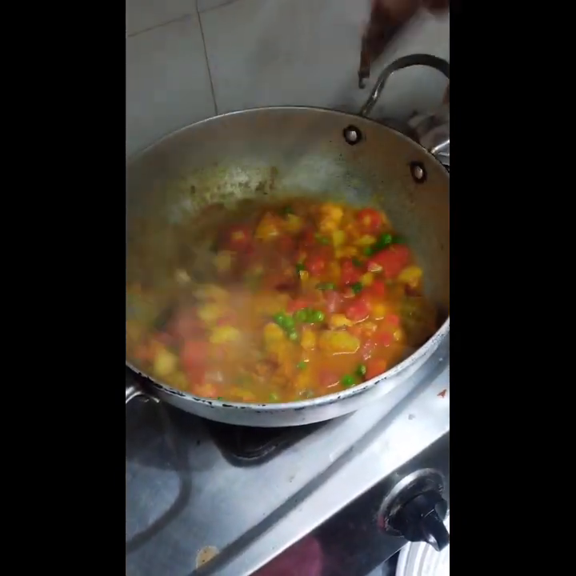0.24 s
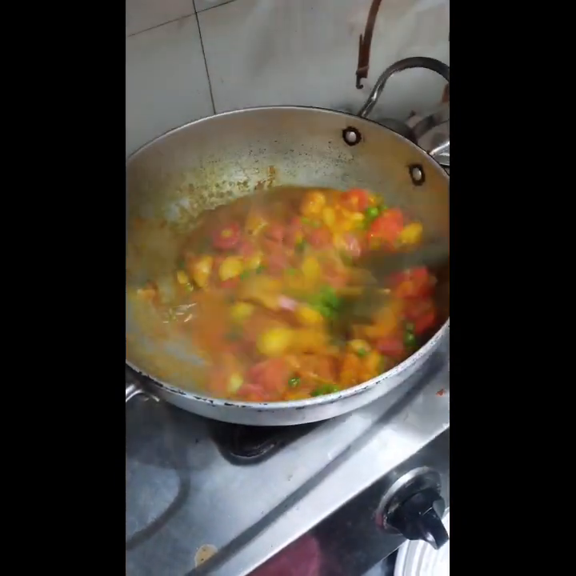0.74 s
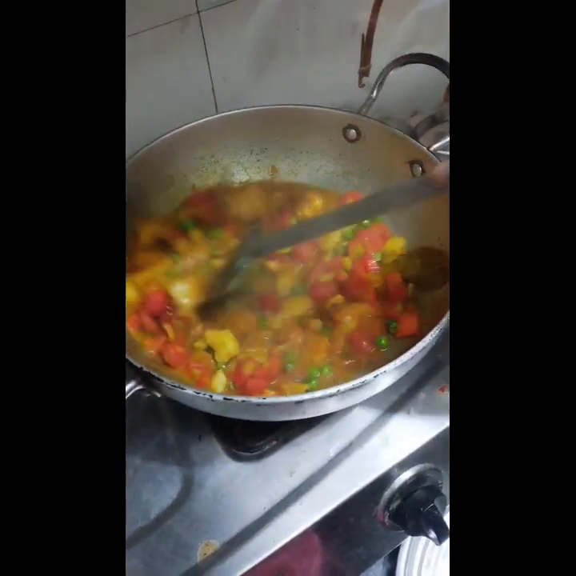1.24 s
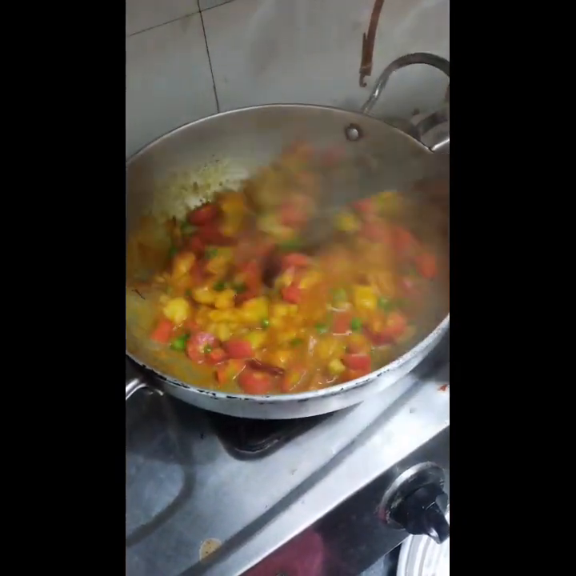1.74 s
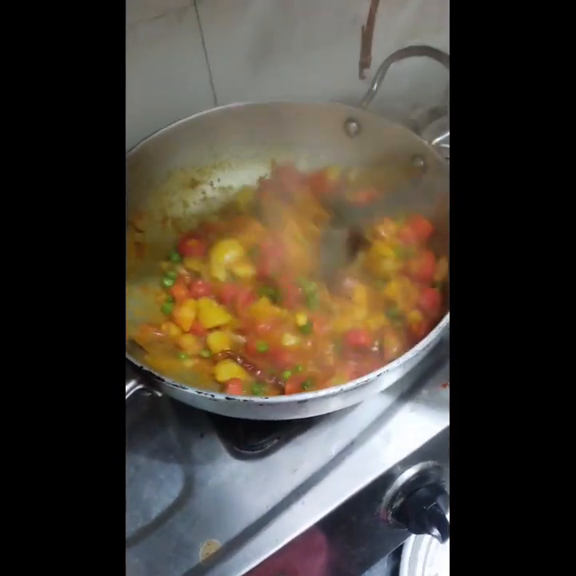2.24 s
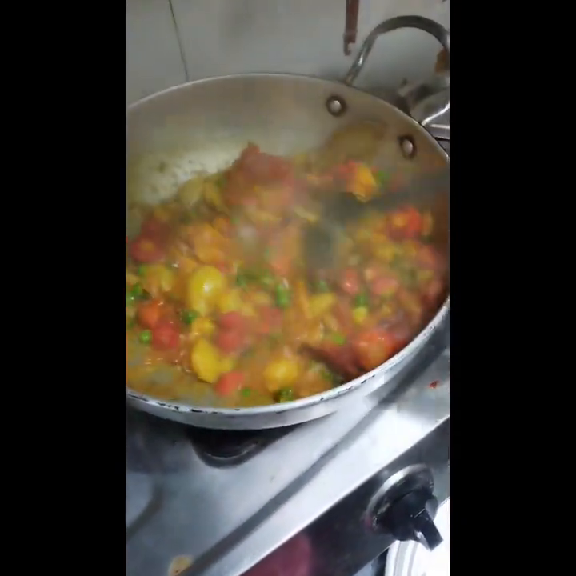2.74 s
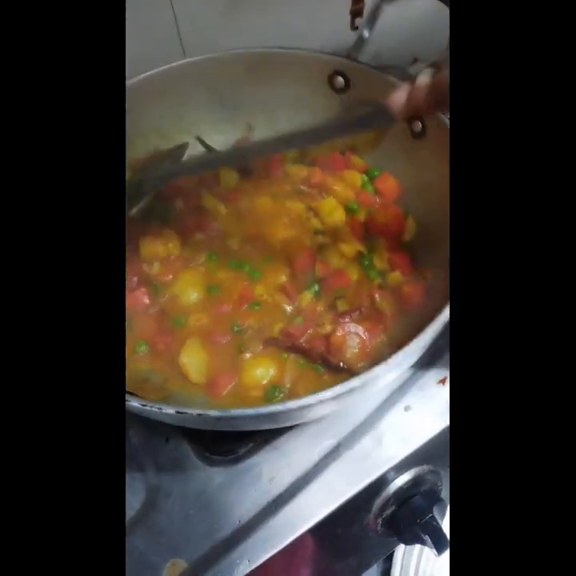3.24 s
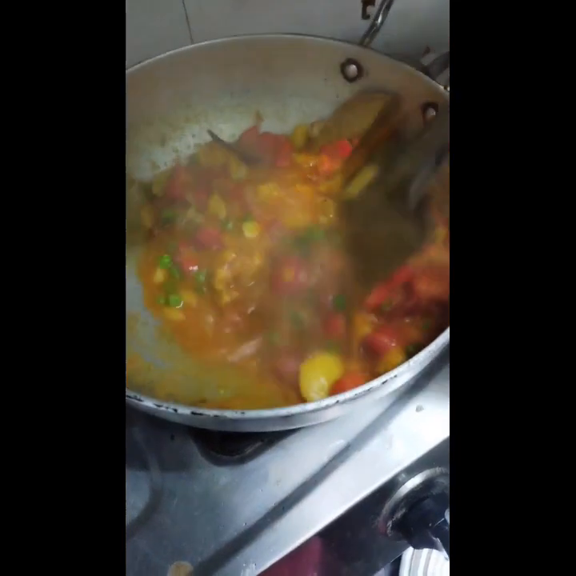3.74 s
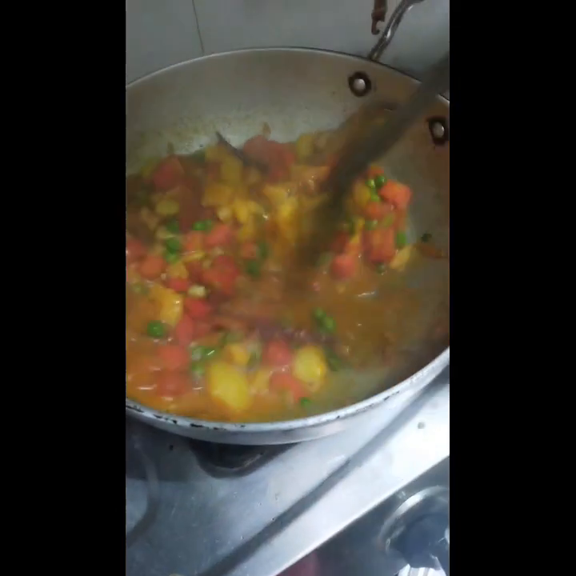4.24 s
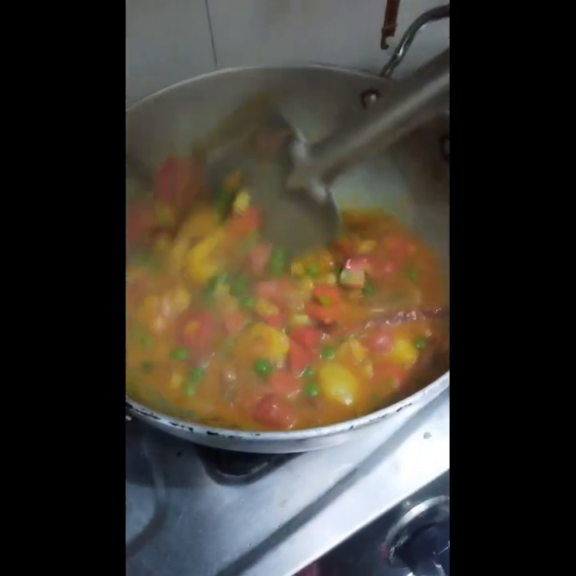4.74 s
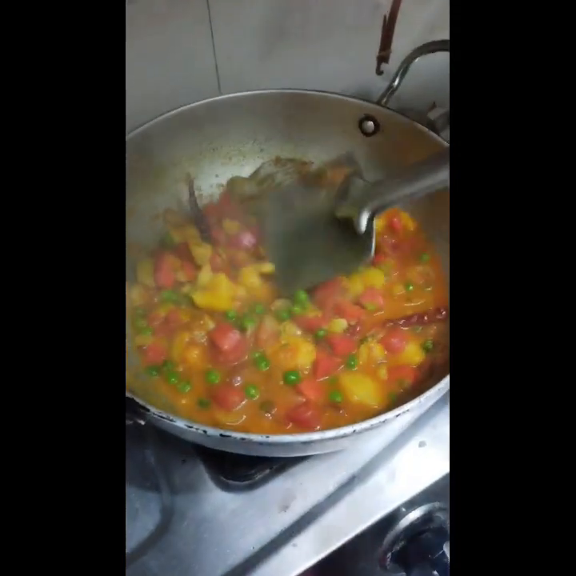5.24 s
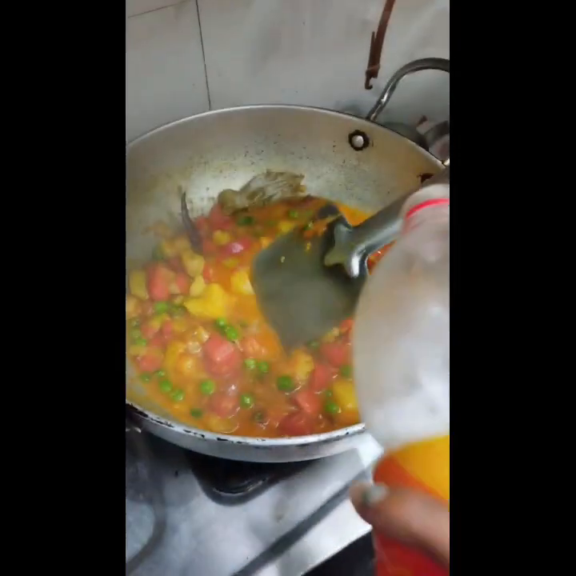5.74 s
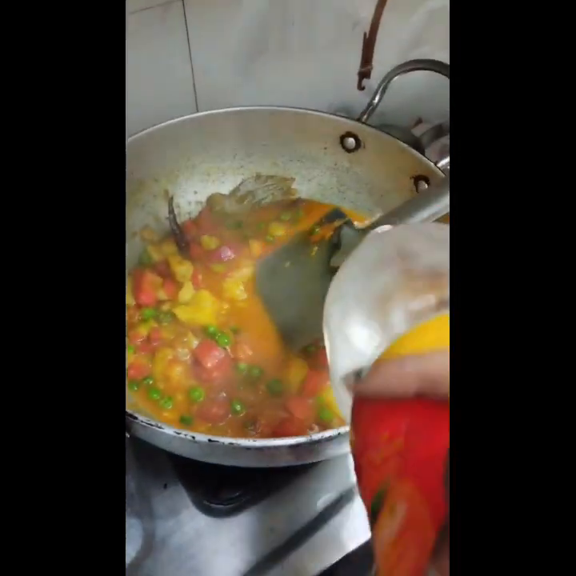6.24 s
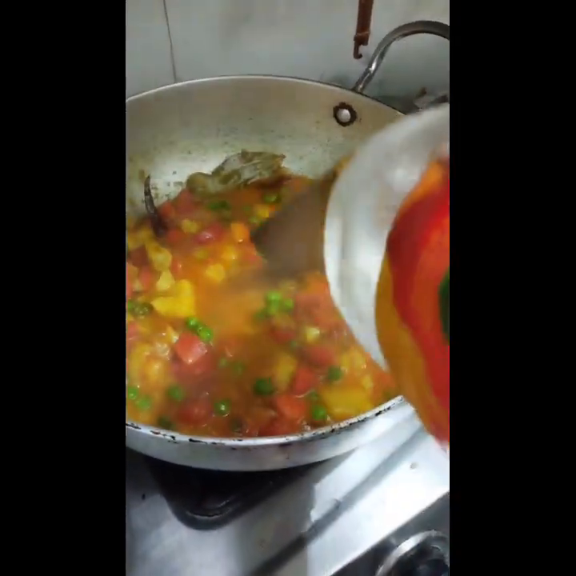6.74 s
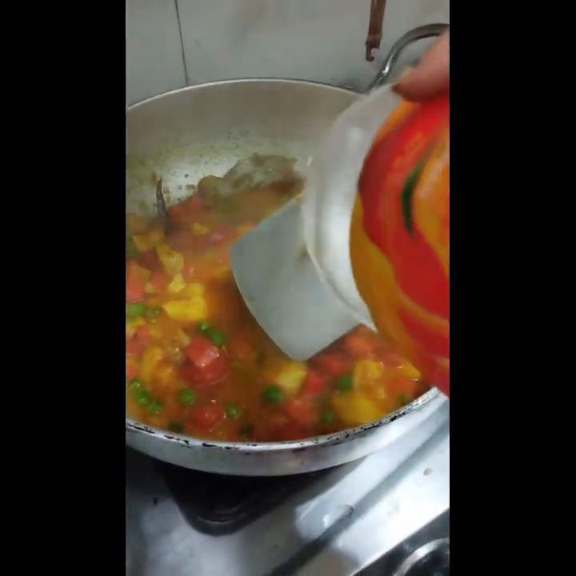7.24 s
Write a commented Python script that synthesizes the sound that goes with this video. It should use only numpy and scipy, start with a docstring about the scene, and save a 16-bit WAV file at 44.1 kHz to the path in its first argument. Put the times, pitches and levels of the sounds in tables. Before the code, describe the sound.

A bright steel clash opens the scene, then a spatula pushes in short wet scrapes through vegetables frying with a steady crisp sizzle. A loud metallic scrape and double bangs follow mid-way. The spatula settles with light ticks, a plastic bottle crumples and pops sharply, and water glugs in low gulps with tiny drips. Close microphone, small tiled kitchen, soft low rumble.

```python
"""A steel spatula strikes, skids and scrapes through vegetables sizzling in a metal pan in a small tiled kitchen.
Coloured noise and grains make the scraping and frying; decaying modes make the pan and spatula ring.
The pan knocks on its stand and the spatula ticks as it comes to rest: short bursts of noise and small rings.
A plastic bottle crumples and pops as noise bursts, then water glugs and drips as short rising tones.
A soft low rumble lies under it all. Table levels are relative, ahead of the gains in each function and the mix."""
import sys
import numpy as np
from scipy import signal
from scipy.fft import rfft, irfft, next_fast_len
from scipy.io import wavfile
from scipy.ndimage import map_coordinates

SR = 44100
rng = np.random.default_rng(int(sys.argv[2]) if len(sys.argv) > 2 else 0)


def pcm_store(signal):
    """Save signal as 16-bit PCM."""
    levels = np.round(np.clip(np.atleast_2d(signal), -1, 1) * 32767)
    wavfile.write(sys.argv[1], SR, levels.astype(np.int16).T)


N = 330303
T = np.arange(N) / SR

# the blade strikes the pan: start_s, clash_db, thud_db, ring_db, bowl_tone_db
PAN_BLOWS = [(0.027, -6.5, -19, -34.5, -38), (.086, -15, -42, -34, -39), (3.459, -20.5, -10.5, -23, -25),
             (4.115, -11, -18, -32, -55), (4.131, -11, -22.5, -20, -30.5), (4.599, -6, -18.5, -26.5, -26),
             (4.614, -6.5, -25, -27, -50)]
# the resting spatula taps the rim and nudges the pan: start_s, ping_db, knock_db
RIM_TAPS = [(5.2706, -23, -29.5), (5.3445, -23.5, -47), (5.425, -34.5, -37.5), (5.475, -27.5, -29.5),
            (5.5417, -23, -34), (5.5633, -22.5, -37.5), (5.888, -15.5, -31)]
# modes of the pan, ringing freely: pitch_hz, level_db, t60_s
PAN_MODES = [(243, -16, 1), (298, -8, .2), (464, -4, .17), (748, -9, .35), (1768, -12, .35),
             (1873, -2, .42), (2030, -9, .13), (2305, -5, .22), (2680, -7, .12), (3010, -4.5, .18),
             (3382, -3.5, .14), (4900, -6, .12), (6050, -5, .1), (7258, -1, .13), (8232, -6, .12),
             (8515, -7, .12), (9120, -6, .12)]
# the pan's bowl tone, one mode with a level of its own in each blow: pitch_hz, level_db, t60_s
BOWL_MODE = (1233, 0, 0.38)
# colour of steel edge on steel: frequency_hz, level_db
EDGE_COLOUR = [(1000, -45.5), (3000, -37.5), (4500, -14.5), (6000, -12), (7300, -6), (8300, 1),
               (9500, -2.5), (11000, -8.5), (12500, -15.5), (15500, -20.5)]


def amp(db):
    """Decibels to gain."""
    return 10 ** (np.asarray(db) / 20)


def unit(x):
    """Scale to rms 1."""
    return x / np.sqrt(np.mean(x ** 2) + 1e-20)


def along(points, hz):
    """Interpolate (frequency, value) points on a log frequency axis."""
    f, v = np.transpose(points)
    return np.interp(np.log(hz + 1), np.log(f + 1), v)


def wobble(rate):
    """A smooth random curve with rate knots a second."""
    knots = rng.standard_normal(int(N * rate / SR) + 4)
    return map_coordinates(knots, [T * rate], order=2)


def filtered(x, gain):
    """x times a gain that depends on frequency."""
    m = next_fast_len(N + SR // 2)
    hz = np.fft.rfftfreq(m, 1 / SR)
    return irfft(rfft(x, m) * gain(hz), m)[:N]


def noise(spectrum):
    """Smooth coloured noise of rms 1."""
    white = rng.standard_normal(N)
    return unit(filtered(white, lambda hz: amp(along(spectrum, hz))))


def grains(spectrum, rate, spread_db, smooth_db):
    """Tiny random impulses of uneven size over a bed too dense to tell apart, rms 1."""
    when, size, sign = rng.random((int(rate * N / SR), 3)).T
    sizes = amp(spread_db * np.minimum(-np.log(1 - size), 4)) * np.sign(sign - .5)
    clicks = np.bincount((when * N).astype(int), sizes, N)
    both = unit(clicks) + amp(smooth_db) * rng.standard_normal(N)
    return unit(filtered(both, lambda hz: amp(along(spectrum, hz))))


def fade(t, t60):
    """Gain of a free decay that loses 60 dB in t60 seconds."""
    return np.exp(-np.log(1000) * t / max(t60, 1e-3))


def swell_in(t, rise):
    """Gain that rises towards 1 with a time constant of rise seconds."""
    return 1 - np.exp(-t / max(rise, 1e-4))


def add(track, s, sound):
    """Mix a sound into a track at time s."""
    part = track[max(round(s * SR), 0):][:len(sound)]
    part += sound[:len(part)]


def bursts(rows, rise, t60):
    """Envelope of hits (start_s, level_db) that swell and die away."""
    env, t = np.zeros(N), T[:SR]
    for s, db in rows:
        add(env, s, amp(db) * swell_in(t, rise) * fade(t, t60))
    return env


def ring(modes, scatter_db):
    """One ring of a struck body: decaying sines whose levels scatter and whose signs are random."""
    t = T[:SR * 2 // 3]
    out = np.zeros(len(t))
    for hz, db, t60 in modes:
        strength = amp(db + scatter_db * rng.normal()) * rng.choice([-1, 1])
        out += strength * fade(t, t60) * np.sin(2 * np.pi * hz * t)
    return out


def resonate(x, modes):
    """A body's answer to a continuous push, through one ring of unit energy."""
    body = ring(modes, scatter_db=7.5)
    return signal.fftconvolve(x, body / np.linalg.norm(body))[:N]


def shifting(x):
    """Short-lived resonances come and go as a smooth random gain over frequency and time; rms 1."""
    depth_db, width_hz, life_s = 3.0, 264.6, .04
    hz, t, z = signal.stft(x, SR, nperseg=512)
    knots = rng.standard_normal((400, 800))
    grid = np.meshgrid(hz / width_hz, t / life_s, indexing="ij")
    field = map_coordinates(knots, grid, order=2, mode="mirror")
    return unit(signal.istft(z * amp(depth_db * field), SR, nperseg=512)[1][:N])


def room_tone():
    """The burner rumbles softly and steadily; now and then the same low noise swells and sinks again."""
    # swells of the rumble: start_s, level_db, t60_s
    swells = [(.95, -50, 1.7), (2.2, -59, 12), (3.5, -33, 1.15), (4.3, -44.5, 10), (5.549, -50.5, 8.4),
              (6.07, -55, 0.71), (7.0, -56, 3.2)]
    # colour of the rumble: frequency_hz, level_db
    rumble_colour = [(15, -4.5), (27, 3.5), (38, -2.5), (52, -18.5), (72, -10), (110, -7), (170, -17),
                     (290, -18), (450, -23.5), (1000, -34.5), (3000, -41), (15000, -80)]
    level = amp(-58)  # the steady burner
    for s, db, t60 in swells:
        age = np.maximum(T - s, 0)
        level = level + amp(db) * swell_in(age, 0.013) * fade(age, t60)
    return level * noise(rumble_colour)


def kitchen(x):
    """Tiled walls answer closely with a tail of decaying noise; the treble dies first."""
    # decay time of the room: frequency_hz, t60_s
    room_decay = [(150, 1), (400, 0.37), (1000, 0.38), (3000, 0.3), (8000, 0.31), (15000, 0.21)]
    hz, t, z = signal.stft(rng.standard_normal(SR // 2), SR, nperseg=256)
    decay = np.exp(-np.log(1000) * t / along(room_decay, hz)[:, None])
    tail = signal.istft(z * decay, SR, nperseg=256)[1]
    tail = np.concatenate([np.zeros(SR // 250), tail])  # 4 ms before the first answer
    return signal.fftconvolve(x, tail / np.linalg.norm(tail))[:N]


def drips():
    """A few small drops from the bottle plink into the sauce, each a tiny bubble of rising pitch."""
    # single drops: start_s, level_db, starting pitch_hz
    drops = [(6.76, -54, 2710), (7.04, -50, 2430), (7.304, -43.5, 1320)]
    out, t = np.zeros(N), T[:SR // 4]
    for s, db, hz in drops:
        tone = np.sin(2 * np.pi * hz * t * (1 + .5 * t))
        add(out, s, amp(db) * swell_in(t, 0.0025) * fade(t, 0.049) * tone)
    return out


def glugs():
    """Air gulps back through the bottle neck: a big and a small bubble, rising a little, with a slosh around them."""
    # gulps, about seven a second: start_s, big_bubble_db, small_bubble_db
    gulps = [(6.613, -32, -27), (6.753, -30, -39), (6.908, -25, -37), (7.034, -50, -41),
             (7.189, -25.5, -43), (7.328, -38.5, -51), (7.443, -32.5, -53)]
    # the big and the small bubble: starting pitch_hz, t60_s
    bubbles = [(270, .085), (486, 0.055)]
    # colour of the sloshing water: frequency_hz, level_db
    slosh_colour = [(80, 3), (170, -2), (280, -6), (650, -7.5), (1000, -30), (2000, -46), (6000, -22.5),
                    (15000, -27)]
    slosh_rows = [(s, max(levels)) for s, *levels in gulps]
    out = amp(-5.5) * bursts(slosh_rows, rise=0.0018, t60=0.088) * noise(slosh_colour)
    t = T[:SR // 2]
    for s, *levels in gulps:
        for db, (hz, t60) in zip(levels, bubbles):
            tone = np.sin(2 * np.pi * hz * t * (1 + 1.5 * t))
            add(out, s, amp(db) * swell_in(t, 0.0033) * fade(t, t60) * tone)
    return out


def bottle():
    """Thin plastic crumples in a run of snaps that ring the hollow body, then pops back."""
    # small dry snaps as the bottle is picked up and handled: start_s, level_db
    creases = [(4.992, -41.5), (5.636, -27), (6.098, -27.5), (6.49, -29.5), (6.54, -40.5), (6.84, -48),
               (7.339, -35.5)]
    # the wall buckles: start_s, hollow_db, crackle_db, rise_s, hollow t60_s
    buckles = [(5.647, -16, -20.5, 0.013, 0.49)]
    # the dented wall springs back: start_s, level_db, t60_s
    spring_back = (6.2995, -8.5, .16)
    # air and walls of the bottle: pitch_hz, level_db, t60_s
    bottle_modes = [(500, -9, 0.77), (561, -5, 0.26), (684, 3, 0.1), (930, 7, 0.12), (1058, -16, 0.23),
                    (1108, -5.5, 0.16), (1203, -19, 0.1), (1850, -6, 0.043), (2700, -6.5, 0.04)]
    # colours of the hollow body, the crackle and the pop: frequency_hz, level_db
    hollow_colour = [(50, -32), (160, -12), (430, -13), (510, 0), (690, -5), (820, -3), (980, -3),
                     (1170, 5.5), (1350, -4.5), (1850, 0.5), (2500, -4.5), (3200, -8.5), (3800, -14.5),
                     (9000, -27)]
    crackle_colour = [(800, -13), (3000, -16.5), (5000, -11.5), (6800, -4.5), (8500, 2), (10500, -4),
                      (12500, -13.5), (15500, -34)]
    pop_colour = [(100, -51), (240, -13.5), (350, -14), (750, -6.5), (1500, -3.5), (2100, -4), (2700, -6),
                  (3500, -14.5), (5000, -9.5), (7000, -15.5), (8400, -7), (10500, -10.5), (12500, -23),
                  (15500, -30)]

    snaps = grains(hollow_colour, rate=570, spread_db=2.5, smooth_db=10.5)
    body = unit(resonate(rng.standard_normal(N), bottle_modes))
    hollow = unit(snaps + body)
    crackle = grains(crackle_colour, rate=800, spread_db=2.5, smooth_db=6)
    out = amp(1.5) * bursts(creases, rise=0.00063, t60=0.078) * crackle
    for s, hollow_db, crackle_db, rise, t60 in buckles:
        boom = bursts([(s, hollow_db)], rise, t60) * hollow
        rustle = bursts([(s, crackle_db)], rise, 0.68 * t60) * crackle
        out += amp(2.5) * (boom + rustle)
    s, db, t60 = spring_back
    return out + bursts([(s, db)], rise=0.00018, t60=t60) * noise(pop_colour)


def knocks():
    """Short hollow knocks of the pan on its stand: an even run when it rocks, a single one after a tap."""
    # the pan is set rocking: start_s, first_knock_db, rocking_s, change_per_knock_db
    rockings = [(.972, -24.5, .18, -3.5), (1.383, -23, .06, 0.5), (3.853, -32, .1, -2),
                (4.289, -32, .06, 5.5), (4.542, -37.5, .02, 0), (4.994, -33.5, .02, 0),
                (6.075, -36, .06, 5)]
    # colour of pan on stand: frequency_hz, level_db
    stand_colour = [(100, -14), (300, -23), (700, -12.5), (950, -21.5), (1090, 5), (1280, -19),
                    (1500, -9.5), (2000, -12.5), (2800, -23.5), (8000, -24.5)]
    period_s, nudge_lag_s = .041, .009  # knock to knock; tap to knock
    hits = []
    for s, db, length, step_db in rockings:
        for k in range(int(length / period_s) + 1):
            hits.append((s + k * period_s, db + k * step_db))
    hits += [(s + nudge_lag_s, db) for s, _, db in RIM_TAPS]
    return amp(3.0) * bursts(hits, rise=0.0037, t60=0.053) * noise(stand_colour)


def ticks():
    """Light taps make the spatula ping; scattered modes change the colour of each ping, not its peak."""
    # modes of the spatula, ahead of a common fade: pitch_hz, level_db, t60_s
    spatula_modes = [(5060, -9.5, 0.052), (6300, -16, .08), (8000, 1, 0.029), (8990, 3.5, 0.066),
                     (9000, -7, 0.062), (9720, 7, 0.049), (11220, -8, 0.066), (12600, -10, .055),
                     (13900, -16, 0.037), (15000, -18.5, .04)]
    taps, t = [row[:2] for row in RIM_TAPS], T[:SR * 2 // 3]
    out = amp(-8) * bursts(taps, rise=0.0018, t60=0.036) * noise(EDGE_COLOUR)
    for s, db in taps:
        ping = ring(spatula_modes, scatter_db=4.5) * swell_in(t, 0.0014) * fade(t, t60=0.14)
        add(out, s, amp(db + 1) * ping / np.abs(ping).max())
    return out


def sizzle():
    """Countless steam bubbles burst in the oil; every flare adds its own power to the simmer."""
    # wet food is turned onto hot metal, flares up and dries off: start_s, level_db, t60_s
    flares = [(0, -38, 3.9), (1.155, -36, 8.9), (1.78, -33.5, 2.9), (4.45, -38, 2.1)]
    # colour of frying: frequency_hz, level_db
    frying_colour = [(150, -11.5), (400, -21), (1200, -16), (2500, -17), (4000, -21.5), (6000, -15),
                     (7300, -8.5), (8400, -2.5), (9500, -5.5), (11000, -10), (12500, -18), (15500, -18.5)]
    power = amp(-51.5) ** 2  # the steady simmer
    for s, db, t60 in flares:
        age = np.maximum(T - s, 0)
        power = power + (amp(db) * swell_in(age, 0.011) * fade(age, t60)) ** 2
    flutter = amp(0.48 * wobble(10))
    return np.sqrt(power) * flutter * grains(frying_colour, rate=990, spread_db=3.0, smooth_db=3.5)


def squeals():
    """Friction feeds one resonance with a wandering phase; the narrower it is, the longer it rings on when let go."""
    # the sliding edge makes the metal sing: start_s, length_s, pitch_hz, width_hz, level_db
    squeal_rows = [(0.102, 0.12, 3006, 15, -40.5), (0.207, 0.039, 3620, 62, -33.5),
                   (0.231, .198, 1232, 17, -33.5), (.28, 0.17, 1888, 16, -41),
                   (1.861, 0.018, 2506, 440, -31.5), (2.458, 0.038, 1816, 400, -32.5),
                   (2.69, 0.02, 697, 130, -33.5), (2.808, .029, 1434, 190, -39.5),
                   (2.973, 0.056, 1774, 450, -30.5)]
    out, t = np.zeros(N), T[:SR]
    for start, length, hz, width_hz, db in squeal_rows:
        free = np.maximum(t - length, 0)  # seconds since the edge let go
        t60 = 0.057 + 5.5 / width_hz
        steps = (free == 0) * rng.standard_normal(SR)
        drift = np.cumsum(steps) * np.sqrt(2 * np.pi * abs(width_hz) / SR)
        tone = np.sin(2 * np.pi * hz * t + drift)
        add(out, start, amp(db + 1) * swell_in(t, 0.0013) * fade(free, t60) * tone)
    return out


def strokes(axis):
    """Envelope of the stirring from one level column: each stroke bites, eases or swells as it travels, and lifts."""
    # spatula strokes: start_s, length_s, food_push_db, steel_edge_db, easing_db_per_s
    stroke_rows = [(.04, 0.037, -39, -51, 10), (0.096, .14, -30.5, -31, 19), (0.251, 0.15, -28.5, -39.5, 0),
                   (0.94, 0.094, -31.5, -37, -11), (1.355, 0.11, -32, -35, 15),
                   (1.587, 0.1, -38.5, -45, -25), (1.747, 0.085, -47, -59, -20),
                   (1.873, 0.076, -31, -36, -7), (1.971, 0.4, -40.5, -41, 1.5),
                   (2.425, 0.24, -34.5, -42.5, 27), (2.688, 0.11, -33.5, -35.5, 102),
                   (2.813, 0.054, -38.5, -40, 50), (2.952, .11, -32.5, -39, 29.5),
                   (3.533, 0.3, -23.5, -26.5, 52.5), (4.501, 0.22, -49.5, -46.5, -41),
                   (4.71, 0.14, -29, -35.5, 40)]
    attack_s, release_t60_s = 0.0089, 0.16
    env, t = np.zeros(N), T[:SR]
    for row in stroke_rows:
        start, length, easing = row[0], row[1], row[-1]
        held = amp(row[axis] - easing * np.minimum(t, length))
        lifted = fade(np.maximum(t - length, 0), release_t60_s)
        add(env, start, held * swell_in(t, attack_s) * lifted)
    return env


def clangs():
    """The pan's modes ring on after each blow, and die sooner while the blade pushes through the food."""
    pressing = np.minimum(strokes(axis=2) / amp(-38.5), 1)
    pressed = np.cumsum(pressing) / SR  # seconds of full contact so far
    out = np.zeros(N)
    for s, _, _, ring_db, bowl_db in PAN_BLOWS:
        pan = amp(ring_db) * ring(PAN_MODES, scatter_db=2.5)
        free = pan + amp(bowl_db) * ring([BOWL_MODE], scatter_db=2.5)
        since = pressed[round(s * SR):][:len(free)]
        add(out, s, free * fade(since - since[0], t60=0.81))
    return out


def blows():
    """Steel on pan: a bright clash and a thud damped by the food."""
    # colour of the thud: frequency_hz, level_db
    thud_colour = [(60, -27), (150, -5.5), (280, 0.5), (500, -4.5), (800, 1), (1250, 1.5), (1900, -0.5),
                   (2600, -3), (3400, -1.5), (4500, -10.5), (9000, -29)]
    rows = np.array(PAN_BLOWS)
    clash = bursts(rows[:, [0, 1]], rise=0.00091, t60=0.057) * noise(EDGE_COLOUR)
    thud = bursts(rows[:, [0, 2]], rise=0.0028, t60=0.087) * noise(thud_colour)
    return clash + thud


def squelches(rate, centre_hz, octaves, cycles, spread_db):
    """Little wet pockets of sauce collapse, each a short rising blip at its own pitch; rms 1."""
    draw = rng.random((int(rate * N / SR), 3))
    chance = rng.standard_normal(len(draw))
    t = T[:SR // 80]
    hz = np.clip(centre_hz * 2 ** (octaves * chance), 220, 5000)[:, None]
    size = amp(spread_db * np.minimum(-np.log(1 - draw[:, 1]), 3))[:, None] * np.sqrt(hz)
    decay = np.exp(-np.maximum(hz / cycles, 200) * t)
    pops = size * decay * np.sin(2 * np.pi * hz * t * (1 + 8 * draw[:, 2:] * t))
    at = (draw[:, :1] * N).astype(int) + np.arange(len(t))
    return unit(np.bincount(at.ravel(), pops.ravel(), N)[:N])


def scraping():
    """The blade sticks and slips through wet, lumpy food and rubs the pan's modes; its edge chatters on the metal."""
    # the edge chatters over bare metal: middle_s, level_db
    skids = [(.1, -17.5), (1, -20.5), (1.935, -26), (2.7, -38.5), (3.538, -13), (3.614, -17.5),
             (3.651, -12.5), (3.668, -12), (3.743, -24), (4.735, -25)]
    # colour of the push through food: frequency_hz, level_db
    push_colour = [(60, -12.5), (150, -10.5), (300, 6), (450, -5.5), (700, -4), (1200, -3.5), (1900, -1.5),
                   (2700, -4), (4000, -7.5), (7000, -10.5), (15000, -42)]
    grip = wobble(70)
    wet = squelches(rate=700, centre_hz=1250, octaves=.85, cycles=7, spread_db=2)
    sing = unit(resonate(rng.standard_normal(N), PAN_MODES + [BOWL_MODE]))
    rub = grains(push_colour, rate=500, spread_db=1.5, smooth_db=-1.5)
    mush = shifting(amp(1.5) * rub + wet + amp(-9.5) * sing)
    lumps_db = -0.3 * wobble(28.25)  # pieces of vegetable catch on the blade
    push = strokes(axis=2) * amp(-1.83 + 0.97 * grip + lumps_db) * mush

    chatter, t = np.zeros(N), T[:SR // 5] - .1
    for s, db in skids:
        add(chatter, s + t[0], amp(db) * np.exp(-.5 * (t / 0.006) ** 2))  # bell curve, 6 ms deviation
    pressure = np.hypot(strokes(axis=3) * amp(2.5 + 2.1 * grip), chatter)
    return push + pressure * shifting(grains(EDGE_COLOUR, rate=1800, spread_db=0.0, smooth_db=2.5))


def scene():
    """Everything on the stove, in the room; rings, knocks and water send 2 dB less into the walls."""
    spread = sizzle() + scraping() + blows() + bottle()
    close = clangs() + squeals() + ticks() + knocks() + glugs() + drips()
    direct = amp(0.5) * (spread + close)
    reflected = amp(-7) * kitchen(spread + amp(-2) * close)
    return (direct + reflected + room_tone())[None]


def record(dry):
    """Round off the highest peaks and keep nothing above the band limit."""
    top_hz = 15550
    rounded = dry[0] / (1 + np.abs(dry[0]) ** 6) ** (1 / 6)
    return filtered(rounded, lambda hz: hz < top_hz)[None]


dry = scene()
out = record(dry)
pcm_store(out)
```